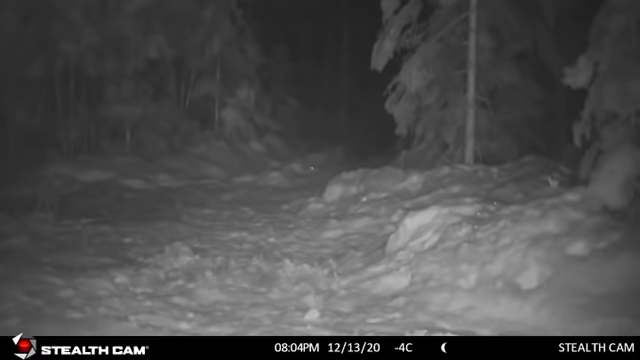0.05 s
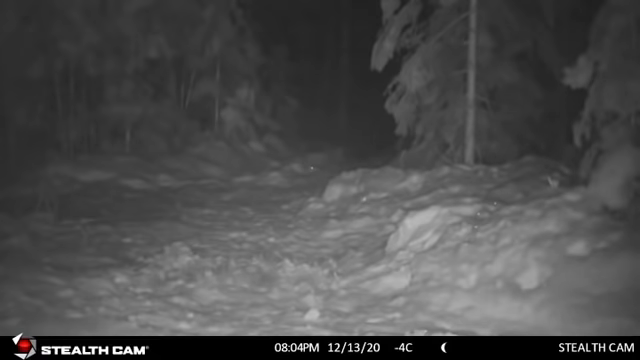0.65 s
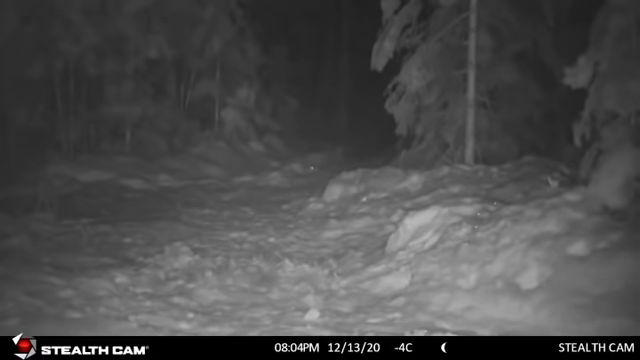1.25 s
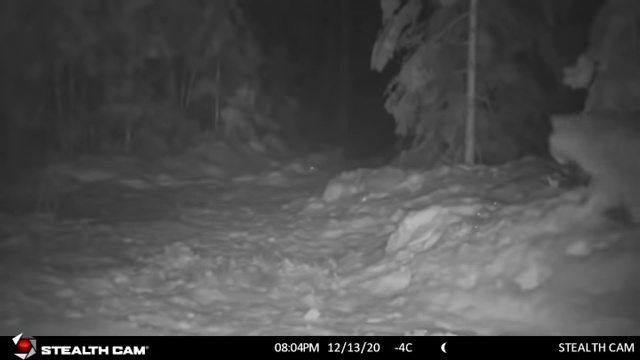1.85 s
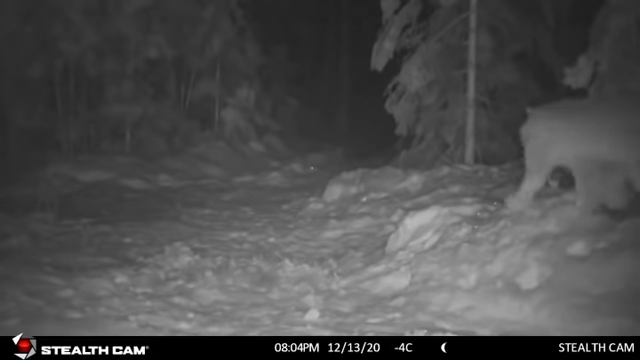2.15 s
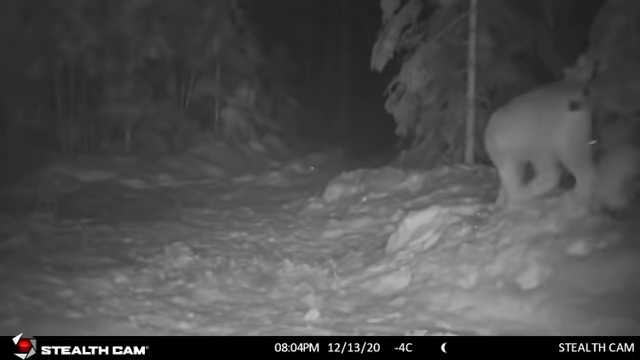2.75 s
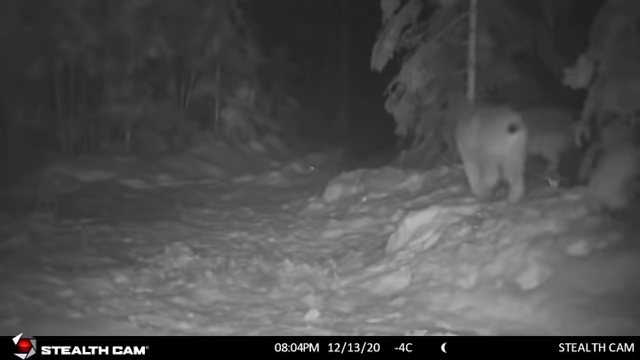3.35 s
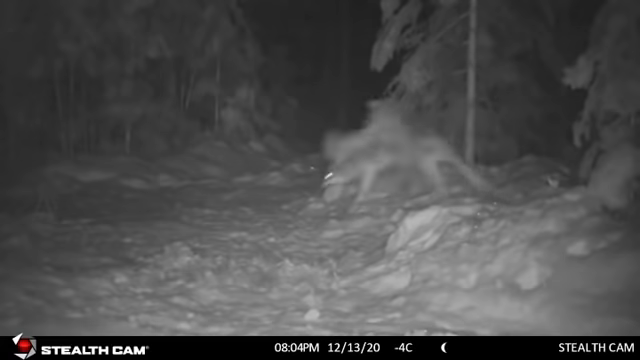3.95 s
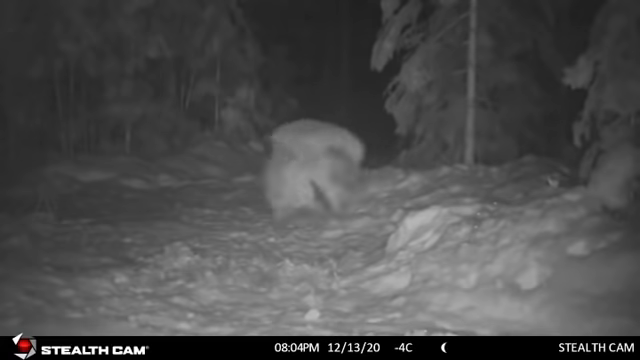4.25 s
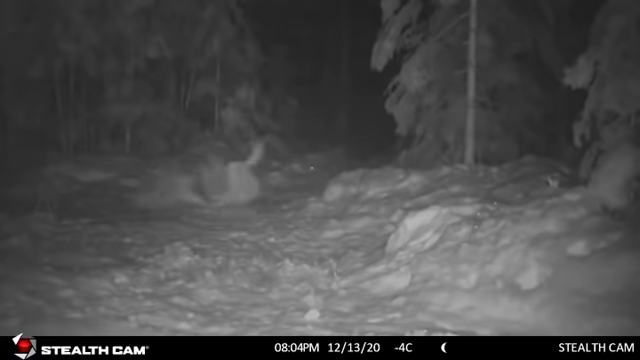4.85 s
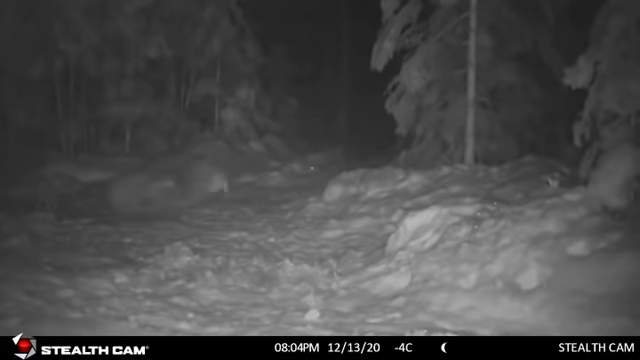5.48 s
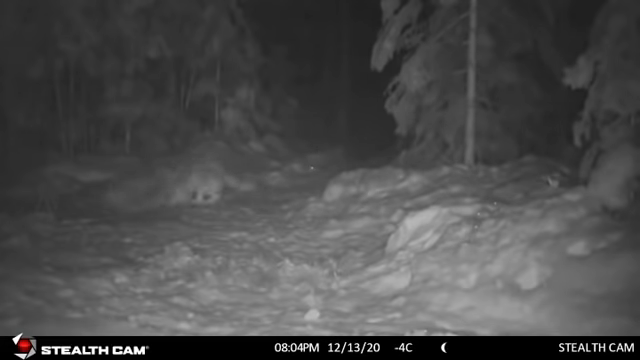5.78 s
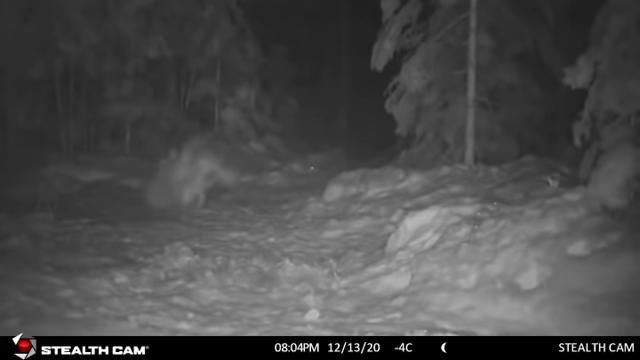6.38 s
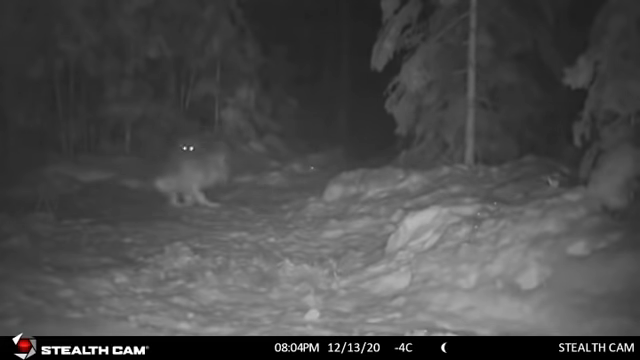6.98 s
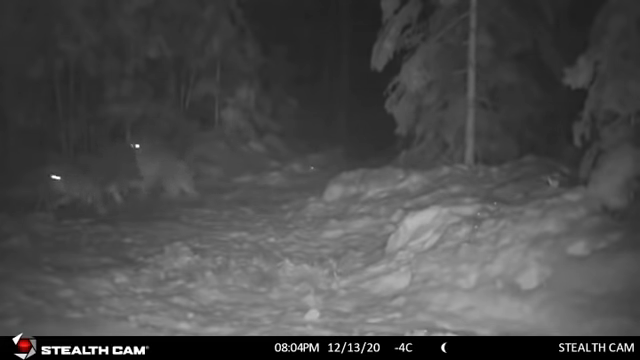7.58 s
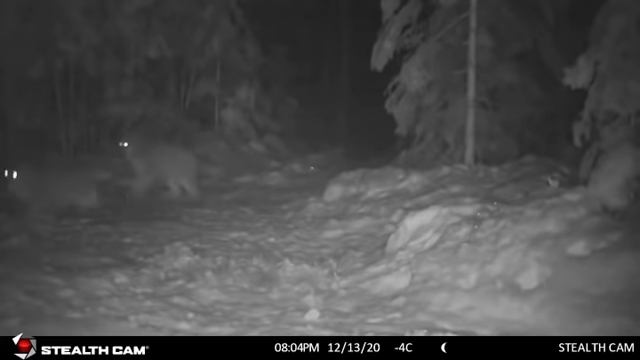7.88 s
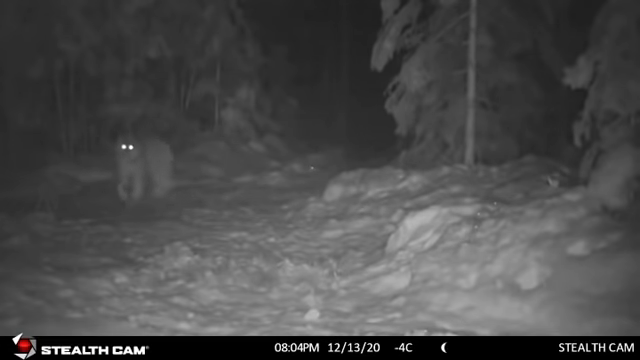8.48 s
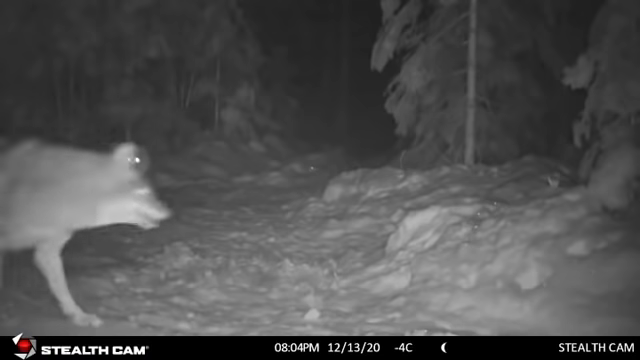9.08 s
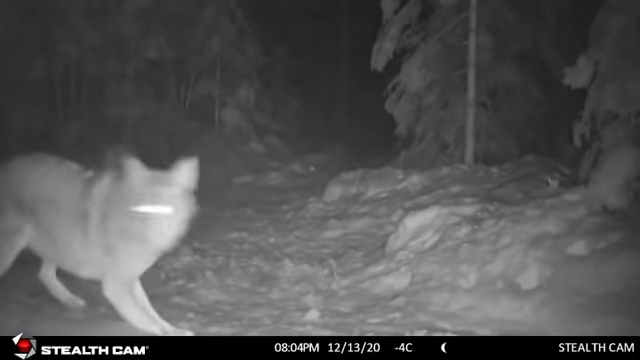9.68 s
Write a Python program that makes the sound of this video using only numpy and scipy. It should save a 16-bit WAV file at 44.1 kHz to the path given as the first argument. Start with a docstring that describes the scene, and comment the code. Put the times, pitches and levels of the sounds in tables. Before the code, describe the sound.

A wolf and a lynx scuffle in a snowy forest near the microphone. Light crunching steps and rustling come first, then a brief hiss and a few quiet grunts. Loud snarls follow, rising and falling in pitch and flipping between clear yowls and rough rasps over dull thuds. Afterwards there are faint breaths and paws breaking the icy crust, loudest near the end. Quiet night air and microphone hiss lie underneath.

```python
"""Night forest, crusted snow: a wolf and a lynx fight near the microphone of a trail camera.
First paws stir the powder and snap the crust. Near 3 s come a hiss, a huff and low grunts, and weight
thuds on the ground. From 4.2 to 7.6 s a rasp opens a run of wavering snarls: vocal folds flip between
clean tone, period doubling and rough chaos, shaped by jaw and bared teeth. The trees answer faintly.
Then huffs and more steps, with the loudest crunch at 9.4 s, over night air and microphone hiss."""
import sys
import numpy as np
from scipy import signal
from scipy.fft import rfft, irfft, next_fast_len
from scipy.io import wavfile
from scipy.ndimage import uniform_filter1d, map_coordinates

SR = 44100
rng = np.random.default_rng(int(sys.argv[2]) if len(sys.argv) > 2 else 0)


def master_out(mix):
    """Clip the mix to full scale and print it as 16-bit PCM to the path in sys.argv[1]."""
    frames = np.transpose(np.atleast_2d(mix))
    ceiling = np.clip(frames, -1, 1)
    pcm = np.round(ceiling * 32767).astype(np.int16)
    wavfile.write(sys.argv[1], SR, pcm)


N = 429074

# Levels are relative within a table; each source adds its own gain.
# pitch of the vocal folds, one curve a snarl: (time [s], pitch [Hz])
SNARL_PITCH = [
    [(4.213, 165.1), (4.31, 206.8), (4.415, 244.4)],
    [(4.545, 468.6), (4.70, 387.7), (4.76, 368), (4.787, 439), (4.81, 421.3), (4.857, 285), (4.93, 400.4),
     (4.975, 316.3)],
    [(5.238, 448.7), (5.275, 562.5), (5.305, 600), (5.36, 900), (5.41, 581.4), (5.44, 554), (5.50, 402)],
    [(5.48, 409), (5.535, 526.5), (5.605, 624.4), (5.635, 542), (5.70, 429), (5.745, 423)],
    [(5.725, 391), (5.78, 519), (5.81, 550), (5.853, 532), (5.868, 638), (5.96, 554.5), (6.035, 463)],
    [(6.233, 435.5), (6.27, 648.6), (6.315, 745), (6.345, 686.4), (6.38, 818), (6.45, 566.4), (6.53, 866),
     (6.58, 878.3), (6.65, 676), (6.695, 801), (6.765, 600), (6.805, 664), (6.852, 533)],
    [(7.095, 403), (7.14, 655.7), (7.185, 704), (7.22, 584.7), (7.26, 643.4), (7.325, 526), (7.37, 530.4),
     (7.395, 485), (7.47, 467.8), (7.505, 511.8), (7.525, 444.3), (7.56, 420), (7.60, 322)],
]
# effort and mouth opening, one curve a snarl: (time [s], voice [dB], bared-teeth edge over voice [dB])
SNARL_EFFORT = [
    [(4.23, -38, -6), (4.28, -32, -3), (4.325, -36, -5), (4.37, -30.5, 1.5), (4.39, -39, 2.5)],
    [(4.56, -33, -22.5), (4.588, -12.5, -24.5), (4.636, -23, -20.5), (4.702, -15.5, -26.5),
     (4.796, -22.5, -7), (4.826, -23, -16), (4.858, -36, -21.5), (4.914, -29.5, -18.5),
     (4.95, -35.5, -12.5)],
    [(5.255, -26.5, -13), (5.281, -21.5, -14.5), (5.318, -27, -5.5), (5.355, -17.5, -4.5),
     (5.393, -28.5, 3.5), (5.434, -21.5, -11.5), (5.485, -32, -5)],
    [(5.503, -29.5, -14), (5.514, -22, -22), (5.592, -29.5, -14), (5.628, -20, -16.5), (5.725, -43.5, -8.5)],
    [(5.745, -36.5, -12), (5.803, -24.5, -9), (5.851, -21, -19), (5.921, -19, -16), (5.991, -28.5, 2.5),
     (6.02, -36.5, -3)],
    [(6.25, -22, -2), (6.31, -17.5, -7), (6.352, -22.5, -9.5), (6.385, -20.5, 7.5), (6.424, -21.5, 1),
     (6.52, -20.5, 0.5), (6.554, -13.5, 2), (6.598, -21.5, -1.5), (6.688, -25, -6.5), (6.75, -30, -24),
     (6.785, -25, -15), (6.825, -27, -18)],
    [(7.115, -27.5, -14), (7.147, -16, -12.5), (7.19, -14, -12), (7.225, -17.5, -12), (7.255, -11, -19.5),
     (7.305, -16.5, -6.5), (7.48, -16, -12), (7.535, -18, -3), (7.585, -27, -5)],
]
# character of each snarl: (steady roughness [0-1], doubling strength [ratio], fray of partials [rad],
# hollow depth [dB], half-open jaw resonance [Hz], resting lip resonance [Hz], chest [dB], spit [dB])
SNARL_CHARACTER = [(0.57, .9, 0.62, -3, 1130, 2650, 9, -6), (0.16, 2.3, 0.049, 1.5, 1244, 2110, -5.5, -13),
                   (.2, 1.16, 0.13, -2, 1140, 2600, -5, -15.5), (0, 0.19, 0.21, 11.5, 1285, 2100, -8, -15),
                   (0.1, 1, 0.02, 0, 1205, 2400, -5.5, -14), (0.08, 1.4, 0.0092, 1, 1180, 2380, 3, -15),
                   (0.2, 1.66, .03, -1.5, 1226, 1910, -0.5, -15)]
# the folds break into chaos: (start [s], end [s], roughness [0-1])
FOLD_BREAKS = [(4.54, 4.7, 0.73), (4.698, 4.79, 0.51), (5.33, 5.475, 0.39), (5.509, 5.536, 0.53),
               (5.855, 5.962, 0.44), (6.245, 6.511, 0.38), (6.593, 6.806, .38), (7.123, 7.171, 0.4),
               (7.21, 7.294, 0.5), (7.494, 7.602, 0.49)]
# the lips draw back: (time [s], rise of their resonance [octaves], half length [s])
LIP_PULLS = [(4.365, 0.71, 0.012), (5.377, 0.44, 0.0098), (6.371, 0.52, 0.025), (7.5, 0.58, 0.083)]
# the voice trembles around these moments: (time [s])
FLUTTER_TIMES = [5.44, 5.52, 5.67]
# air through the folds: (frequency [Hz], level [dB])
BREATH_SPECTRUM = [(300, -0.5), (700, -8.5), (1200, -4), (2200, -5), (5000, 2)]
# body of the voice, from the throat: (frequency [Hz], level [dB])
THROAT_SPECTRUM = [(150, -26), (300, -22.5), (450, 1), (650, 5.5), (1000, 5), (1300, 2), (1700, -1),
                   (2100, -28), (3000, -70)]
# bright edge of bared teeth: (frequency [Hz], level [dB])
TEETH_SPECTRUM = [(1200, -63.5), (1700, -2), (2100, -2), (2650, -1), (3050, -7), (3500, -9), (4200, -18.5),
                  (5800, -40), (8000, -49.5)]
# gap between the fangs: (time [s], resonance [Hz], push of air [dB])
FANG_GAP = [(6.36, 6000, -2), (6.44, 7400, 6), (6.52, 5795, 2.5), (7.3, 5960, -4.5), (7.42, 5250, 0.5),
            (7.52, 7430, 6)]
# air past the fangs: (frequency [Hz], level [dB])
SPIT_SPECTRUM = [(3800, -26), (4500, 0), (5700, -8.5), (7200, -8.5), (9300, 1), (11000, -15), (13000, -19)]
# single throat pulses: (time [s], level [dB])
GRUNT_PULSES = [(3.467, -31.5), (3.495, -30), (3.634, -41), (3.651, -44), (3.955, -35), (3.974, -34),
                (7.024, -38)]
# the chest's colour on a grunt: (frequency [Hz], level [dB])
GRUNT_SPECTRUM = [(100, -17), (300, -4.5), (800, -1.5), (1300, -14.5), (2000, -36), (4000, -61)]
# a short warning hiss: (time [s], level [dB])
HISS_BURSTS = [(2.765, -35.5)]
# air over the tongue: (frequency [Hz], level [dB])
HISS_SPECTRUM = [(600, -6.5), (1400, -1.5), (2200, -17), (3100, 0), (3900, -3), (5000, -18.5), (12000, -20)]
# faint breaths: (start [s], end [s], level [dB], mouth resonance [Hz])
HUFF_BREATHS = [(2.861, 3.306, -57, 680), (7.812, 8.035, -55, 1340), (9.036, 9.19, -53, 1260)]
# fur and paws keep stirring the snow: (time [s], level [dB])
RUSTLE_LEVEL = [(0.0, -47.5), (1.08, -42), (2.22, -53), (2.65, -48), (3.71, -56.5), (3.78, -44),
                (4.69, -46.5), (4.9, -60), (6.34, -45), (6.74, -57.5), (7.02, -47.5), (7.72, -49.5),
                (9.4, -60), (9.73, -57)]
# a paw or a body sweeps through snow: (start [s], length [s], level [dB])
SNOW_SWEEPS = [(0, 0.049, -42.5), (0.183, 0.049, -39.5), (0.248, 0.14, -42), (0.787, 0.12, -37.5),
               (1.095, 0.06, -33.5), (1.521, 0.068, -38.5), (1.81, 0.079, -43.5), (2.553, 0.018, -42.5),
               (3.144, 0.078, -48), (3.532, 0.065, -42.5), (3.737, 0.11, -35.5), (3.84, 0.15, -32),
               (4.056, 0.12, -34), (4.329, 0.063, -34.5), (5.066, 0.031, -37.5), (5.609, 0.0084, -37),
               (6.404, 0.044, -32), (6.604, 0.074, -35.5), (7.51, 0.1, -42.5), (7.651, 0.037, -43.5),
               (7.789, 0.13, -50), (8.036, 0.034, -43.5), (8.398, 0.056, -41), (8.539, 0.11, -44),
               (8.807, 0.019, -45), (9.38, 0.11, -36.5)]
# loose snow: (frequency [Hz], level [dB])
POWDER_SPECTRUM = [(100, -35), (350, -5), (1300, -8.5), (2500, -12), (4000, -4.5), (5300, -6.5),
                   (8100, 1.5), (10700, 2), (13300, -8.5)]
# the crust breaks: (time [s], level [dB], brightness [dB per octave])
CRUST_BREAKS = [(0.143, -23, 2), (0.699, -26, -0.5), (0.741, -20.5, -0.5), (0.791, -20, -1.5),
                (0.97, -26, -4), (1.099, -23, -1.5), (1.134, -26.5, -3), (1.434, -26.5, -2),
                (1.803, -27.5, -4), (1.949, -30.5, 2), (2.16, -28.5, -0.5), (2.564, -29, -2.5),
                (2.698, -30, 18), (3.726, -31, -4), (8.021, -30, -2), (8.283, -30.5, -0.5),
                (8.574, -27.5, -4), (8.809, -26, -3), (9.045, -29.5, -0.5), (9.376, -21, 0.5),
                (9.39, -11, -1.5), (9.423, -17, -3), (9.458, -17, -3), (9.586, -32.5, 3),
                (9.709, -26.5, 4.5)]
# icy crust: (frequency [Hz], level [dB])
CRUST_SPECTRUM = [(100, -12), (300, -15), (1260, -8), (2100, -12.5), (3400, -1.5), (5200, -2), (7000, 6.5),
                  (9000, 10), (13300, -0.5)]
# a plate of crust scrapes under a paw: (start [s], length [s], level [dB], resonance [Hz])
PLATE_SCRAPES = [(0.255, 0.066, -46, 4380), (0.3, 0.019, -47.5, 2100), (3.78, 0.24, -52, 3520),
                 (6.919, 0.035, -39, 5850), (8.563, 0.029, -48, 900), (9.026, 0.045, -44.5, 3830)]
# thin flakes of ice snap: (time [s], level [dB])
ICE_TICKS = [(0.042, -23), (0.171, -14), (0.403, -16), (0.577, -16), (0.627, -20), (0.792, -7),
             (8.131, -24), (8.781, -23), (9.009, -21.5)]
# weight lands on the ground: (time [s], level [dB], thud t60 [s])
LANDINGS = [(3.146, -48, 0.61), (4.023, -38, 0.045), (4.115, -36.5, 0.68), (4.598, -35, 0.9),
            (5.057, -35, 0.52), (5.629, -41, 0.476), (6.047, -37.5, 1), (6.411, -39, 0.99),
            (6.876, -39, 0.73), (7.291, -42.5, 0.74), (7.805, -45, 0.26), (8.05, -45.5, 0.4),
            (8.287, -47, 0.2), (8.419, -41.5, 0.2), (8.472, -47, 0.12), (8.565, -44.5, 0.34),
            (9.01, -46.5, 0.23), (9.455, -43.5, 0.29)]
# the ground under a landing: (frequency [Hz], level [dB])
GROUND_SPECTRUM = [(25, -40), (60, 1.5), (110, -4.5), (200, -15), (500, -23.5), (2500, -52)]
# snow squeezed under a paw: (frequency [Hz], level [dB])
PACKING_SPECTRUM = [(150, 0), (400, 5.5), (1300, -0.5), (2500, -1), (4000, -3), (9000, -37)]
# decay among the trunks: (frequency [Hz], t60 [s])
FOREST_DECAY = [(200, 0.21), (1200, 0.68), (3000, 0.74), (10000, 0.74)]
# night air and microphone hiss: (frequency [Hz], level [dB])
NIGHT_SPECTRUM = [(20, -2.5), (80, 4.5), (700, -6.5), (3500, -16), (5000, -18.5), (10000, -22),
                  (13000, -22)]
# stereo image at the microphone: (frequency [Hz], left-right likeness [0-1])
STEREO_LIKENESS = [(3500, 1), (5000, 0.98), (13000, 0.73)]


def snarls(half_open_db=-7.5, edge_db_per_octave=38, chest_hz=562, hollow_ratio=1.334):
    """The folds sound through the jaw resonance; bared teeth add an edge. Gives voice and stereo spit."""
    cries, spray = np.zeros(N), np.zeros((2, N))
    for arch, effort, character in zip(SNARL_PITCH, SNARL_EFFORT, SNARL_CHARACTER):
        steady, doubling, fray, hollow_db, jaw_hz, lip_hz, chest_db, spit_db = character
        start, end = arch[0][0], arch[-1][0]
        t = times(start, end)
        pitch, = curves(arch, t)
        voice_db, edge_db = curves(effort, t)
        jaw = jaw_hz * 2 ** ((edge_db - half_open_db) / edge_db_per_octave)  # rises as teeth are bared
        lips = lip_hz * 2 ** sum(rise * bell(t, s, half) for s, rise, half in LIP_PULLS)
        hollow = (hollow_ratio * jaw, hollow_db)  # the mouth swallows a band just above the jaw's
        reach = 9.8 * 2 ** ((voice_db + 21.5) / 9)  # effort shuts the folds harder: more partials
        rough = roughness(t, steady)
        source, phase = folds(pitch, doubling * doubling_share(pitch, voice_db), rough, fray, reach)
        source = filtered(source, lambda hz: amp(chest_db / (1 + (hz / chest_hz) ** 4)))
        voice = tract(source, THROAT_SPECTRUM, jaw, rest_hz=1050, stretch=0.12,
                      width_hz=160, lift_db=11.5, ripple_db=2.2, hollow=hollow)
        edge = tract(source, TEETH_SPECTRUM, lips, rest_hz=2320, stretch=0.67,
                     width_hz=520, lift_db=5.5, ripple_db=3.5, hollow=hollow)
        envelope = gate(t, start, end, rise_s=0.014, fall_s=0.024) * flutter(t)
        add(cries, start, envelope * amp(voice_db - 1) * (voice + amp(edge_db) * edge))
        add(spray, start, envelope * amp(spit_db) * spit(t, voice_db, edge_db, phase, rough))
    return side_cavities(cries), side_cavities(spray)


def folds(pitch, doubling, rough, fray, reach, jitter=0.045, shimmer_db=2.4, chaos_rad=0.99, puff_hz=300):
    """Vocal fold pulses; roughness shakes them and lets air through. Gives sound and half-pitch phase."""
    n = len(pitch)
    waver = jitter * (rough + 0.03) * (wobble(400, n) + 0.6 * wobble(70, n))
    phase = np.pi * np.cumsum(pitch * (1 + waver)) / SR
    tone = np.zeros(n)
    for k in range(1, 17):  # odd k: the lines that doubling adds halfway between harmonics
        weight = (doubling if k % 2 else 1) / np.hypot(1, k / reach) * np.exp(-rough * (k / 7) ** 2)
        lead = np.pi * k * k / 10  # each pulse starts bright and rings low
        smear = (fray + chaos_rad * rough ** 2) * max(k - 2, 0) * wobble(450, n)
        tone += weight * np.cos(k * phase + lead + smear)
    tone /= np.sqrt(1 + doubling ** 2)
    # one puff of air a cycle, standing apart most below puff_hz
    puffs = np.exp(np.minimum(puff_hz / pitch, 1) * (np.cos(2 * phase) - 0.5))
    air = 6 * (rough + 0.02) * puffs * coloured(rng.standard_normal(n), BREATH_SPECTRUM)
    shimmer = amp(shimmer_db * rough * wobble(330, n))
    return ((1 - rough) * tone + air) * shimmer, phase


def roughness(t, steady, flip_s=0.0118):
    """The folds hold their tone except where they flip into chaos."""
    rough = np.full(len(t), float(steady))
    for start, end, share in FOLD_BREAKS:
        rough[(t >= start) & (t < end)] = share
    return np.clip(uniform_filter1d(rough, size=int(flip_s * SR)), 0.02, 0.95)


def doubling_share(pitch, voice_db, easy_hz=461, db_per_octave=12, threshold_db=-14, knee_db=5):
    """Period doubling sets in once loudness and pitch strain the folds."""
    strain_db = voice_db + db_per_octave * np.log2(pitch / easy_hz)
    return 0.5 + 0.5 * np.tanh((strain_db - threshold_db) / knee_db)


def flutter(t, rate_hz=57, depth_db=3, half_s=0.03):
    """A quick tremble of the voice's strength that comes and goes."""
    swing_db = depth_db * sum(bell(t, s, half_s) for s in FLUTTER_TIMES)
    return amp(swing_db * np.sin(2 * np.pi * rate_hz * t + wobble(rate_hz, len(t))))


def tract(source, spectrum, centre_hz, rest_hz, stretch, width_hz, lift_db, ripple_db, hollow=None):
    """One moving resonance drags the others along; tongue and head movements ripple them. Steady rms 1."""
    hz, frames, bands = signal.stft(source, SR, nperseg=512, noverlap=384)
    hz, t = hz[:, None], np.arange(len(source)) / SR
    centre = np.interp(frames, t, centre_hz)
    gain_db = along(spectrum, hz * (rest_hz / centre) ** stretch)
    gain_db += lift_db * resonance(hz, centre, width_hz)
    if hollow is not None:
        dip_hz, dip_db = hollow
        gain_db -= dip_db * bell(hz, np.interp(frames, t, dip_hz), width=220)
    ripple = uniform_filter1d(rng.standard_normal(bands.shape), size=5, axis=0)
    gain_db += ripple_db * unit(uniform_filter1d(ripple, size=18, axis=1))
    x = signal.istft(bands * amp(gain_db), SR, nperseg=512, noverlap=384)[1][:len(source)]
    return x / np.sqrt(np.abs(uniform_filter1d(x ** 2, size=800)) + 1e-12)


def side_cavities(x, notch_hz=4540, width_hz=560, notch_db=-14):
    """Side cavities of the throat swallow one treble band."""
    return filtered(x, lambda hz: amp(notch_db * bell(hz, notch_hz, width_hz)))


def spit(t, voice_db, edge_db, phase, rough):
    """Air and high overtones whistle past the fangs, more with effort and with the teeth bared."""
    fang_hz, push_db = curves(FANG_GAP, t)
    step = np.gradient(phase)
    overtones = unit(sum(np.cos(k * phase + np.pi * k * k / 10) * (k * step < np.pi)
                         for k in range(1, 40)))
    level_db = voice_db + 0.48 * edge_db + push_db + 1.8 * wobble(159.2, len(t))
    jets = []
    for _ in range(2):
        source = (1 - rough) ** 2 * overtones + np.sqrt(rough) * rng.standard_normal(len(t))
        jets.append(tract(source, SPIT_SPECTRUM, fang_hz, rest_hz=5900, stretch=0.15,
                          width_hz=450, lift_db=9, ripple_db=4))
    return amp(level_db) * np.array(jets)


def grunts():
    """Single throat pulses, coloured by the chest."""
    return bursts(GRUNT_PULSES, GRUNT_SPECTRUM, rise_s=0.001, t60=0.046, gain_db=-18)


def warning_hiss():
    """A sudden push of air over the tongue."""
    return bursts(HISS_BURSTS, HISS_SPECTRUM, rise_s=0.00059, t60=0.52, gain_db=-16.5)


def huffs(width_hz=800):
    """Soft air through one broad resonance of the muzzle."""
    out = np.zeros(N)
    for start, end, db, mouth_hz in HUFF_BREATHS:
        t = times(start, end)
        air = filtered(rng.standard_normal(len(t)), lambda hz: resonance(hz, mouth_hz, width_hz))
        add(out, start, amp(db) * gate(t, start, end, rise_s=0.069, fall_s=0.12) * unit(air))
    return out


def stirred_snow(rise_s=0.013, settle_t60=0.2):
    """Clumps of powder slide with each sweep, then settle, over a low rustle of fur and paws."""
    t = np.arange(N) / SR
    rustle_db, = curves(RUSTLE_LEVEL, t)
    power = amp(rustle_db + 1) ** 2
    age = t[:SR]
    for start, length, db in SNOW_SWEEPS:
        shape = np.minimum(age / rise_s, 1) * decay(np.maximum(age - length, 0), settle_t60)
        add(power, start, (amp(db) * shape) ** 2)
    clumps_db = 1.74 * wobble(30, N) + 2 * wobble(170, N)
    return np.sqrt(power) * amp(clumps_db - 1.5) * grains(POWDER_SPECTRUM, N, rate=1700, spike_db=2.5)


def crunches(snap_t60=0.03, crumble_t60=0.11, gain_db=-23.5):
    """A planted paw snaps the crust, which then crumbles."""
    out, t = np.zeros((2, N)), np.arange(SR // 4) / SR
    for start, db, brightness in CRUST_BREAKS:
        crumble = decay(t, crumble_t60) * amp(5.4 * wobble(404, len(t)))
        colour = [(hz, level + brightness * np.log2(hz)) for hz, level in CRUST_SPECTRUM]
        crystals = grains(colour, len(t), rate=2900, spike_db=0.5)
        add(out, start, amp(db + gain_db) * unit((decay(t, snap_t60) + crumble) * crystals))
    return out


def scrapes(sharpness=4.2, edge_s=0.007):
    """Coarse grains rub a plate of crust into one broad resonance."""
    out = np.zeros((2, N))
    for start, length, db, plate_hz in PLATE_SCRAPES:
        t = times(0, length)
        rub = grains(CRUST_SPECTRUM, len(t), rate=500, spike_db=3)
        ring = filtered(rub, lambda hz: resonance(hz, plate_hz, plate_hz / sharpness))
        add(out, start, amp(db) * gate(t, 0, length, edge_s, edge_s) * unit(ring))
    return out


def ice_ticks():
    """Thin flakes of ice snap without crumbling."""
    return np.array([bursts(ICE_TICKS, CRUST_SPECTRUM, rise_s=0.000348, t60=0.045, gain_db=-35)
                     for _ in range(2)])


def footfalls(creak_stretch=2.1):
    """Weight thuds on the ground; the squeezed snow creaks and dies more slowly."""
    thuds = sum(bursts([(s, db)], GROUND_SPECTRUM, rise_s=0.0013, t60=t60, gain_db=-11.5)
                for s, db, t60 in LANDINGS)
    creaks = sum(bursts([(s, db)], PACKING_SPECTRUM, rise_s=0.0015, t60=creak_stretch * t60, gain_db=-18)
                 for s, db, t60 in LANDINGS)
    return thuds + creaks * amp(3.07 * wobble(300, N))


def forest(x):
    """The trunks around the fight scatter a tail whose bass dies first."""
    hz, t, bands = signal.stft(rng.standard_normal(SR), SR, nperseg=256)
    tail = signal.istft(bands * decay(t, along(FOREST_DECAY, hz)[:, None]), SR, nperseg=256)[1]
    return signal.fftconvolve(x, tail / np.linalg.norm(tail))[:N]


def night_air():
    """Steady noise of the night air and the microphone's own hiss."""
    return amp(-56) * coloured(rng.standard_normal((2, N)), NIGHT_SPECTRUM)


def bursts(rows, spectrum, rise_s, t60, gain_db):
    """Short bursts of noise that swell and die."""
    out, t = np.zeros(N), np.arange(SR // 3) / SR
    shape = (1 - np.exp(-t / rise_s)) * decay(t, t60)
    for start, db in rows:
        noise = coloured(rng.standard_normal(len(t)), spectrum)
        add(out, start, amp(db + gain_db) * unit(noise * shape))
    return out


def grains(spectrum, n, rate, spike_db):
    """Ice crystals snapping: two noises whose strength jumps from grain to grain."""
    return coloured(rng.standard_normal((2, n)) * amp(spike_db * wobble(rate, n)), spectrum)


def spread(pair):
    """Two unrelated signals become left and right: mono in the bass, wider in the treble."""
    turn = lambda hz: np.arccos(np.clip(along(STEREO_LIKENESS, hz), 0, 1)) / 2
    mid, side = filtered(pair, lambda hz: np.array([np.cos(turn(hz)), np.sin(turn(hz))]))
    return np.array([mid + side, mid - side])


def gate(t, start, end, rise_s, fall_s):
    """Smooth attack, hold and release between two times."""
    attack = np.sin(np.pi / 2 * np.clip((t - start) / rise_s, 0, 1))
    release = np.sin(np.pi / 2 * np.clip((end - t) / fall_s, 0, 1))
    return (attack * release) ** 2


def decay(t, t60):
    """A fall of 60 dB every t60 seconds."""
    return amp(-60 * t / t60)


def bell(x, centre, width):
    """A Gaussian bump of height 1."""
    return np.exp(-((x - centre) / width) ** 2)


def resonance(hz, centre, width):
    """A peak of height 1, halved at width from its centre."""
    return 1 / (1 + ((hz - centre) / width) ** 2)


def amp(db):
    """Decibels to gain."""
    return 10 ** (np.asarray(db) / 20)


def unit(x):
    """Scale to rms 1."""
    return x / np.sqrt(np.mean(x ** 2) + 1e-20)


def times(start, end):
    """Sample times in seconds."""
    return np.arange(round(start * SR), round(end * SR)) / SR


def along(points, hz):
    """(frequency [Hz], value) points read on a log axis."""
    knots_hz, values = np.transpose(points)
    return np.interp(np.log(hz + 1), np.log(knots_hz + 1), values)


def curves(rows, t):
    """Each column after the time, read at times t."""
    knots_s, *columns = np.transpose(rows)
    return [np.interp(t, knots_s, column) for column in columns]


def wobble(rate, n):
    """A smooth random curve, rate knots a second."""
    return map_coordinates(rng.standard_normal(int(n * rate / SR) + 4), [np.arange(n) * rate / SR])


def filtered(x, response):
    """x times a response of frequency."""
    n = x.shape[-1]
    padded = next_fast_len(n + 8192)
    return irfft(rfft(x, padded) * response(np.fft.rfftfreq(padded, 1 / SR)), padded)[..., :n]


def coloured(x, spectrum):
    """x shaped by a (frequency [Hz], level [dB]) spectrum, at rms 1."""
    return unit(filtered(x, lambda hz: amp(along(spectrum, hz))))


def add(track, start, x):
    """Mix x into the track from start seconds."""
    part = track[..., max(round(start * SR), 0):][..., :x.shape[-1]]
    part += x[..., :part.shape[-1]]


def scene():
    """Voices and footfalls dead centre; snow, spit, night air and the forest's answer around them."""
    warnings = grunts() + warning_hiss()
    ticks = ice_ticks()
    cries, spray = snarls()
    voices = cries + warnings + huffs()
    answer = amp(-15.5) * np.array([forest(voices), forest(voices)])
    air = night_air()
    steps = footfalls()
    snow = stirred_snow() + crunches() + scrapes() + ticks
    return voices + steps + spread(snow + spray + air + answer)


def record(dry):
    """The camera's microphone channel keeps nothing above 13.3 kHz."""
    return filtered(dry, lambda hz: hz < 13300)


dry = scene()
out = record(dry)
master_out(out)
```